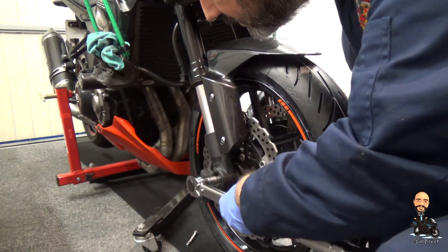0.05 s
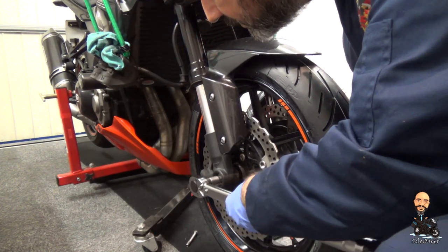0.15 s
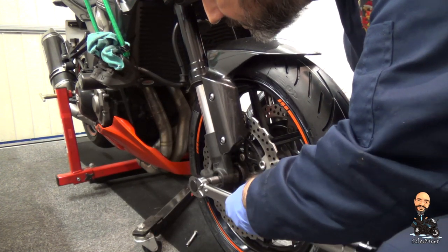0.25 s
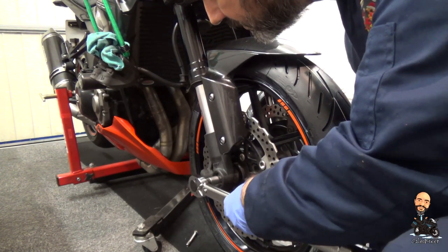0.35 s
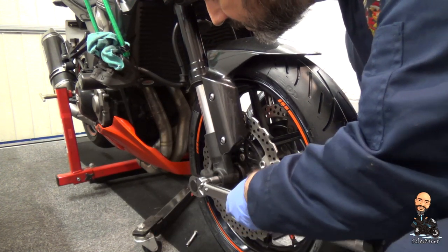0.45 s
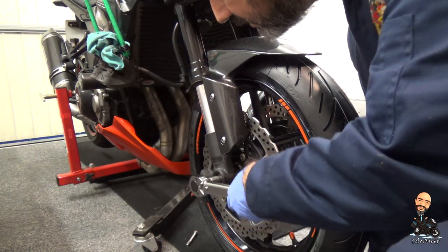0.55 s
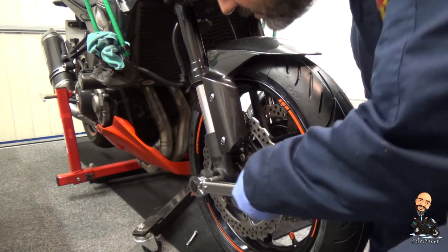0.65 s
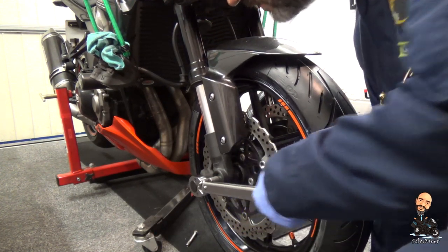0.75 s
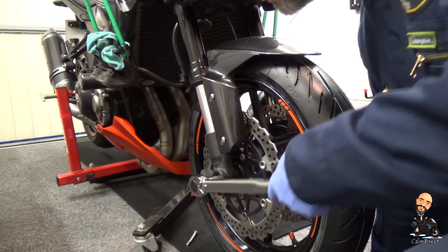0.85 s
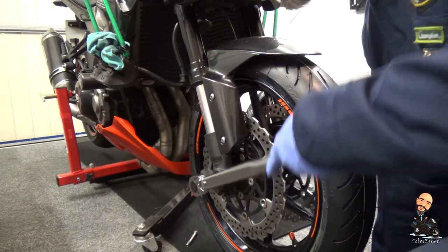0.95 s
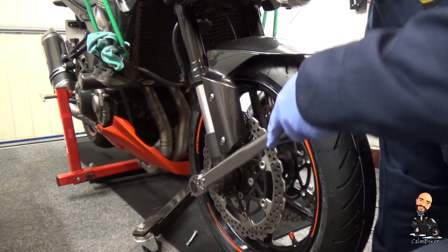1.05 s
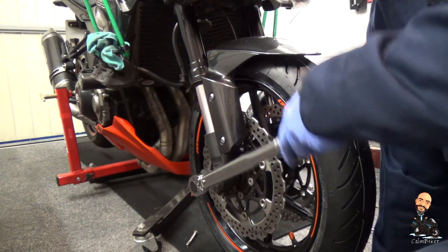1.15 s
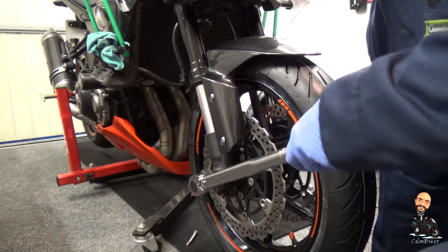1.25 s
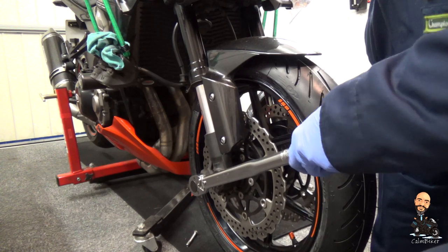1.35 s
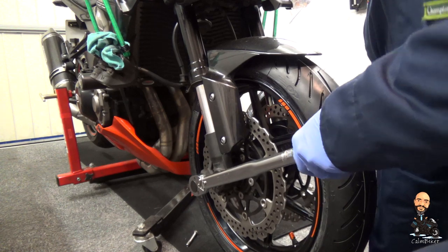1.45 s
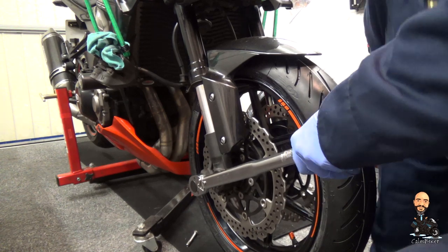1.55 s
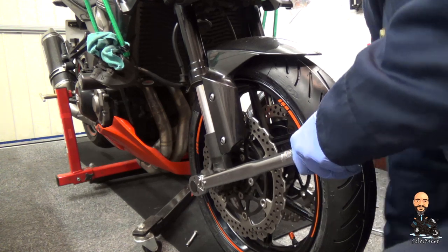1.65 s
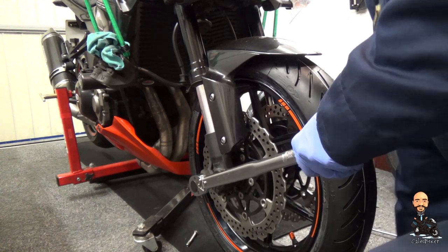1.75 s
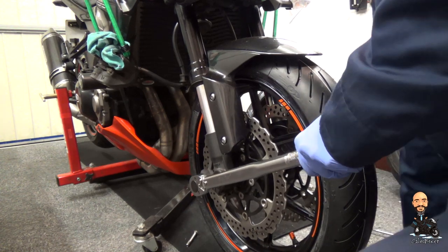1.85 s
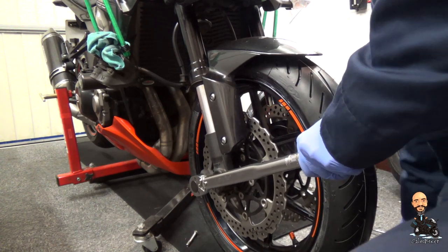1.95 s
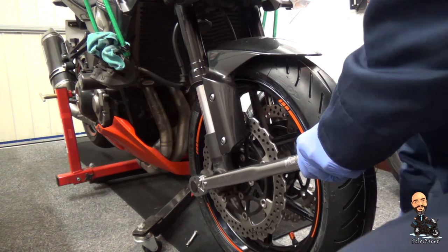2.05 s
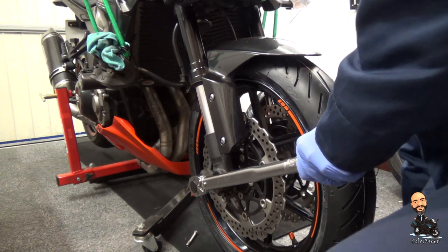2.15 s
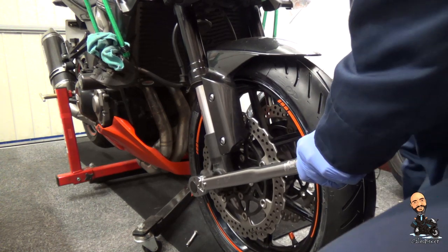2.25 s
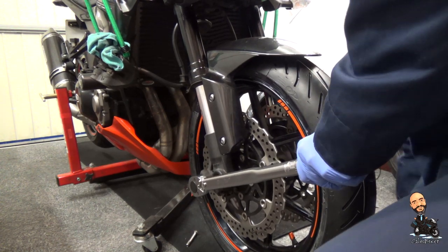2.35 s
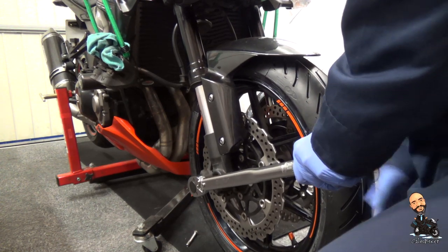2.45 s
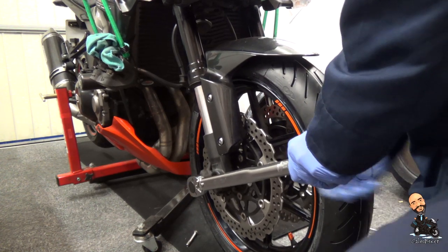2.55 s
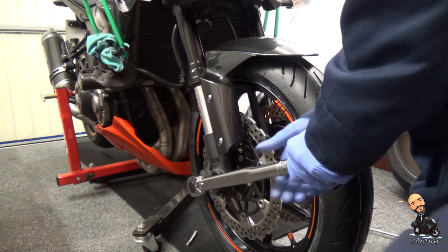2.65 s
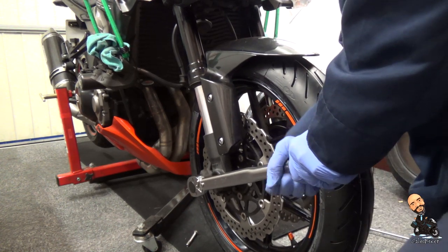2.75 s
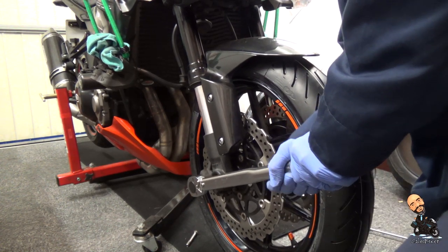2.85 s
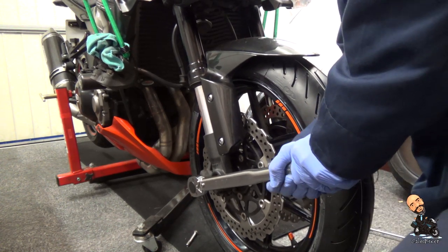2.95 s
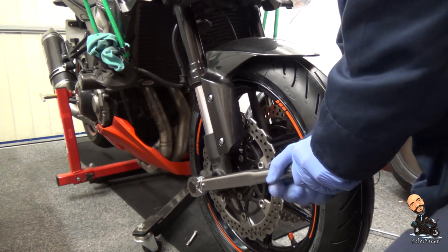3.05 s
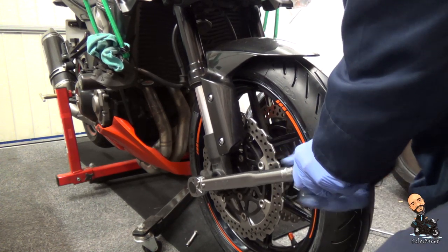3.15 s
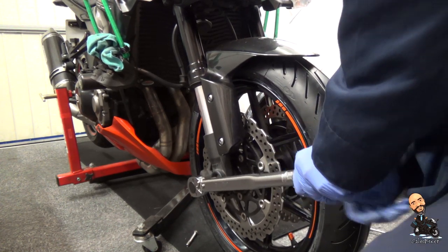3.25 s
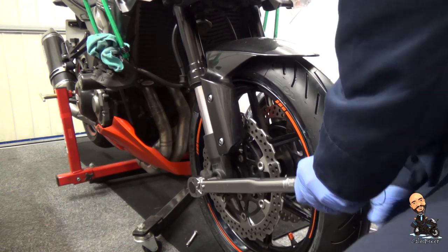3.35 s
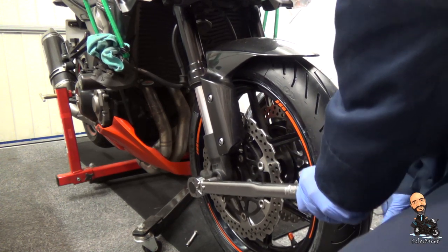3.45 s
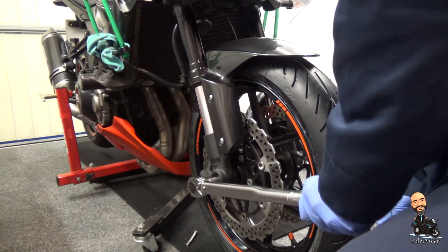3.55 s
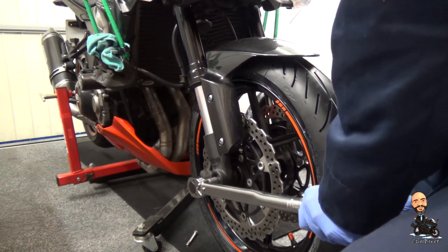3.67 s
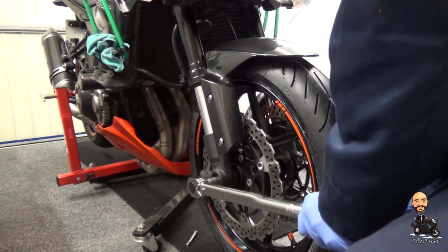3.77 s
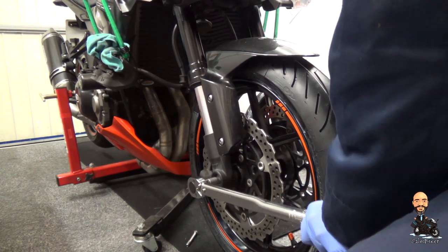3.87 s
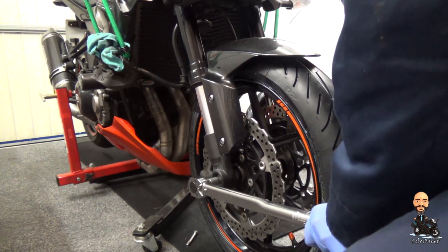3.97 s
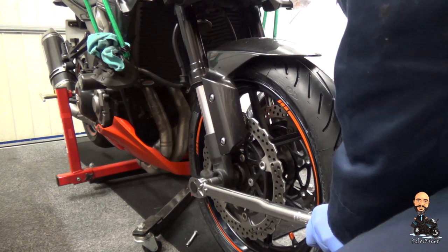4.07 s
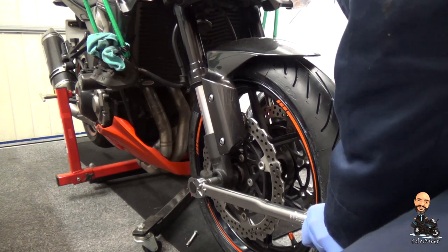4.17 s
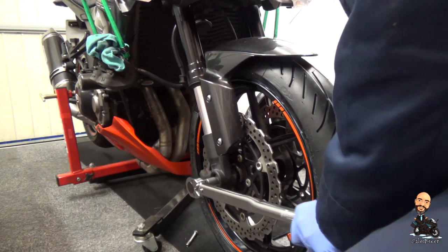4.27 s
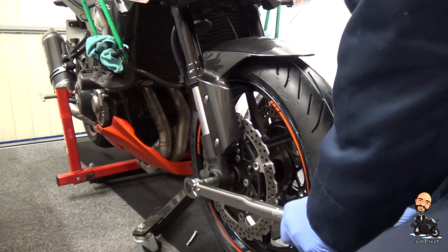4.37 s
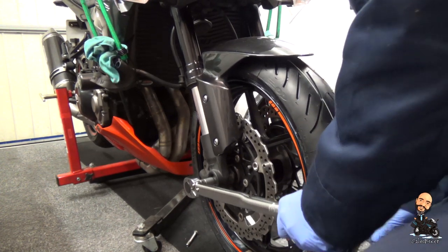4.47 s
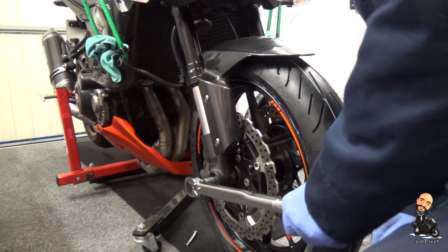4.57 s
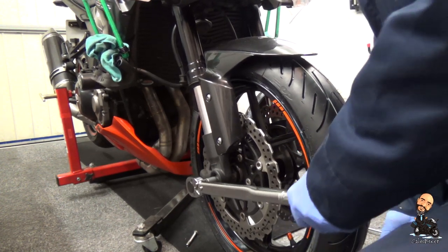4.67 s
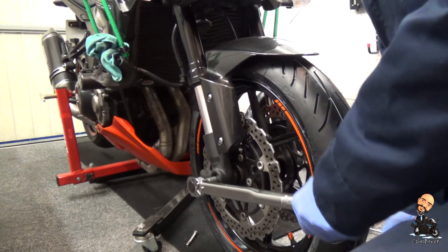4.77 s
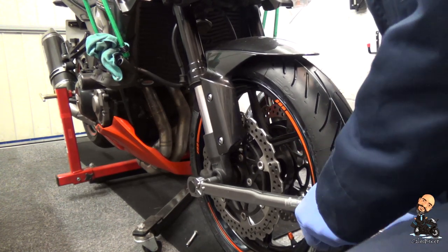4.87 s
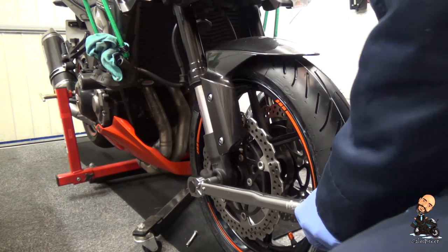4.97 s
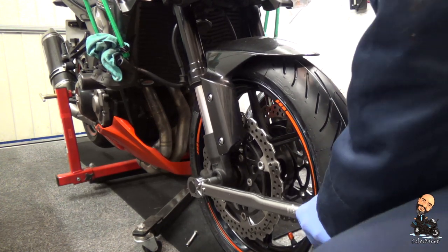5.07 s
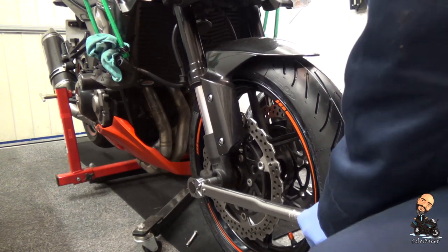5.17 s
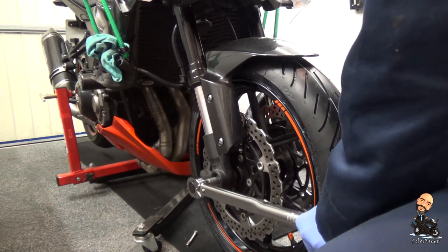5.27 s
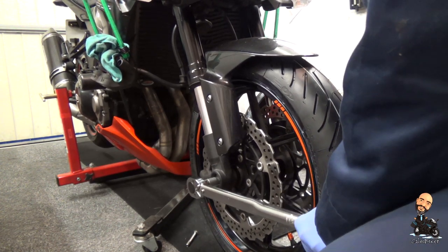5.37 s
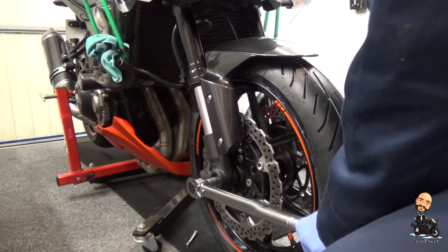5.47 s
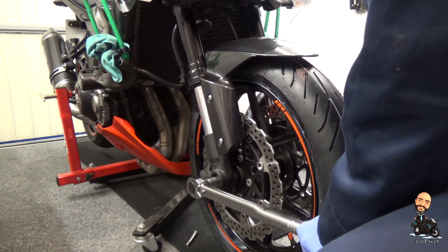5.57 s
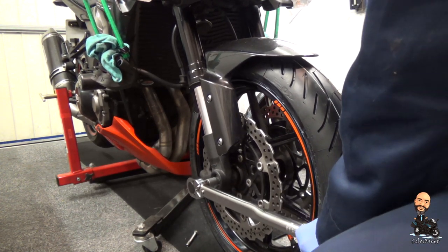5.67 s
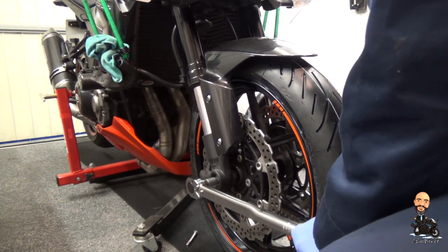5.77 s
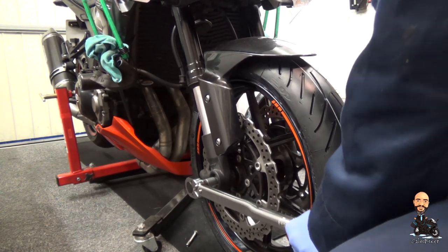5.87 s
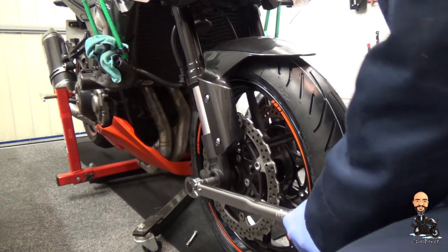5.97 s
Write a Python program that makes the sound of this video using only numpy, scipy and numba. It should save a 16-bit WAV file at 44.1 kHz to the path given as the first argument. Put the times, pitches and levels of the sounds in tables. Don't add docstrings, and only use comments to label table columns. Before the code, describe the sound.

A socket knocks home, a ratchet ticks twice, workwear rustles, then a torque wrench cracks loudly four times in a small hard-walled garage.

```python
import sys
import numpy as np
from scipy import signal
from scipy.fft import rfft, irfft, next_fast_len
from scipy.io import wavfile
from scipy.ndimage import uniform_filter1d
from numba import njit

SR = 44100
rng = np.random.default_rng(int(sys.argv[2]) if len(sys.argv) > 2 else 0)


def volts(x):
    e = np.asarray(x, float) / 20
    return 10 ** e


def master_out(mix):
    frames = np.transpose(np.atleast_2d(mix))
    ceiling = np.clip(frames, -1, 1)
    pcm = np.round(ceiling * 32767).astype(np.int16)
    wavfile.write(sys.argv[1], SR, pcm)


N = 265261
LEAD_S = .003


def on_log(table, hz):
    at_hz, value = np.transpose(table)
    return np.interp(np.log(np.maximum(hz, 1)), np.log(at_hz), value)


def shaped(x, gain):
    size = 2 * next_fast_len(len(x) // 2 + 1)
    hz = np.arange(size // 2 + 1) * SR / size
    return irfft(rfft(x, size) * gain(hz), size)[:len(x)]


def causal(gain_at):
    def gain(hz):
        fold = irfft(np.log(gain_at(hz) + 1e-9))
        half = len(fold) // 2
        fold = np.concatenate([fold[:1], 2 * fold[1:half], np.zeros(len(fold) - half)])
        return np.exp(rfft(fold))
    return gain


def bump(hz, centre_hz, octaves):
    return np.exp(-(np.log2(np.maximum(hz, 1) / centre_hz) / octaves) ** 2)


def unit(x):
    return x / np.sqrt(2 * np.max(uniform_filter1d(x ** 2, size=128)))


def fade(t, t60_s):
    return np.exp(-np.log(1000) * t / t60_s)


def add(out, at_s, sound):
    i = int(at_s * SR)
    sound = sound[..., :N - i]
    out[..., i:i + sound.shape[-1]] += sound


def walk(rate_hz):
    k = int(SR / rate_hz)
    return uniform_filter1d(np.repeat(rng.standard_normal(N // k + 1), k), k)[:N]


def ring(modes, length_s, scatter_db, rough=0.69):
    t = np.arange(int(length_s * SR)) / SR
    total = 0
    for hz, db, t60_s in modes:
        strength, *neighbours = rng.standard_normal(5)
        group = np.sin(2 * np.pi * hz * t)
        for off, turn in (neighbours[:2], neighbours[2:]):
            near_hz = hz + (10 + .0035 * hz) * (off + .5 * np.sign(off))
            group = group + rough * np.sin(2 * np.pi * near_hz * t + 3 * turn)
        total = total + volts(db + scatter_db * strength) * fade(t, t60_s) * group
    return unit(total)


def crack(spectrum, contact_ms, tilt_db, rise_ms=0.765, wet_db=0):
    n = np.arange(int(.12 * SR))
    t = np.maximum(n / SR - LEAD_S, 0)
    rise = np.minimum(1000 * t / rise_ms, 1) ** 2
    rattle = rng.standard_normal(len(t)) * fade(t, contact_ms * .003) * rise
    blow = np.sqrt(np.sum(rattle ** 2)) * (n == int((LEAD_S + rise_ms / 1000) * SR))
    tilt = lambda hz: tilt_db * np.log2(np.maximum(hz, 50) / 3000)
    colour = causal(lambda hz: volts(on_log(spectrum, hz) + tilt(hz)))
    direct = shaped(rattle, colour)
    level = unit(direct).std() / direct.std()
    quiet = np.minimum(n / (LEAD_S * SR), 1) ** 40
    return quiet * np.array([unit(direct), volts(wet_db) * level * shaped(blow, colour)])


# hz, level_db per Hz
HUSH_SPECTRUM = [(18, -58), (30, -14), (307, 4.5), (574, -6.5), (689, 1), (1390, 1.5), (2970, 0),
                 (3390, -2), (7610, -5), (12800, -7.5), (15400, -7.5)]


def hush():
    noise = shaped(rng.standard_normal(N), lambda hz: volts(on_log(HUSH_SPECTRUM, hz)))
    return noise / noise.std() * volts(-60.0)


def rumble():
    low = lambda hz: bump(hz, 112.0, 0.51) + 0.33 * bump(hz, 40., 1.2)
    mid, side = (shaped(rng.standard_normal(N), low) for _ in range(2))
    return volts(-84.0) * (mid + 0.19 * side * np.array([[1], [-1]])) / mid.std()


# hz, t60_s
ROOM_T60 = [(100, 0.41), (400, 0.37), (1500, 0.29), (5000, 0.28), (14000, 0.16)]


def room_response():
    gap_s, rise_s = .002, .004
    t = np.arange(int(.6 * SR)) / SR
    tail = np.zeros(len(t))
    for hz in 60 * 2. ** np.arange(9):
        band = shaped(rng.standard_normal(len(t)), lambda f: bump(f, hz, 0.98))
        build_up = np.clip((t - gap_s) / (rise_s + 5.4 / hz), 0, 1)
        tail += band * fade(t, on_log(ROOM_T60, hz)) * build_up
    spectrum = rfft(tail)
    power = lambda span_hz: uniform_filter1d(np.abs(spectrum) ** 2, size=int(span_hz * t[-1]))
    tail = irfft(spectrum * np.sqrt(power(500) / power(50)), len(t))
    tail = tail * np.clip((t - gap_s) / rise_s, 0, 1) * np.clip((t[-1] - t) / .1, 0, 1)
    return volts(-6) * tail / np.sqrt(np.sum(tail ** 2))


def movements(table):
    peak_s, rise_s, fall_s, level_db, shift_db = np.transpose(table)[:, :, None]
    late_s = np.arange(N) / SR - peak_s
    spans = np.where(late_s < 0, -late_s / np.maximum(rise_s, .02), late_s / np.maximum(fall_s, .02))
    gain = volts(level_db - 12 * spans)
    total = lambda g: np.sqrt(np.sum(g ** 2, axis=0))
    return total(gain), total(gain * volts(shift_db))


# peak_s, rise_s, fall_s, level_db, heaviness_db
FOLDS = [(0, .1, 0.084, -60, 4), (.82, 0.15, 0.14, -51, -20), (1.14, 0.84, 0.12, -48.5, -5),
         (1.29, 0.083, 0.18, -62, 12.5), (1.8, 0.47, 0.6, -49, -12), (2.33, 0.18, .1, -75, -9),
         (2.55, 0.2, 0.49, -47.5, -5), (2.77, 0.25, 0.036, -50.5, -22), (3.4, 0.21, 0.19, -46, -10),
         (4.4, 0.19, 0.15, -54, -6), (4.75, .1, 0.55, -59, -1.5), (5.75, .1, 0.25, -59, 3)]
# peak_s, rise_s, fall_s, level_db, coarseness_db
SLIDES = [(0, .1, 0.24, -56.5, -15), (.82, 0.21, 0.17, -44.5, 1), (.98, 0.26, 0.16, -47, -19),
          (1.18, 0.085, 0.08, -37.5, 5.5), (1.62, 0.22, 0.062, -50, 3), (1.98, 1, 0.11, -54, 1),
          (2.52, 0.93, 0.22, -56, -0.5), (2.78, 0.24, 0.11, -49, 2), (2.87, 0.097, 0.064, -49, -10),
          (3.09, .04, .1, -46, -8), (3.2, 0.18, 0.3, -52, -0.5), (3.5, .3, 0.058, -53.5, 8),
          (4.35, 0.057, 0.18, -61, 2), (4.73, .1, 0.057, -48.5, 0.5), (4.87, 0.034, 0.093, -48, 1.5),
          (5.08, 0.11, 0.32, -56, -16)]


def cloth():
    tight, heavy = movements(FOLDS)
    hiss, coarse = movements(SLIDES)
    rub = np.hypot(coarse, volts(-4.5) * tight)
    # level, rest_db, centre_hz, octaves, grain_db, flicker_hz, flicker_db
    bands = ((heavy, -65, 580.0, 0.67, 2.1, 31, 2),
             (tight, -90, 880.0, 1.55, 1.07, 13, 1.04),
             (rub, -88, 2610.0, 2.57, 2.3, 27, 0.75),
             (hiss, -68, 9860.0, 0.36, 2.3, 27, 3))
    out = np.zeros(N)
    for level, rest_db, centre_hz, octaves, grain_db, flicker_hz, flicker_db in bands:
        grains = rng.standard_normal(N) * volts(grain_db * rng.exponential(size=N))
        band = shaped(grains, lambda hz: bump(hz, centre_hz, octaves))
        flicker = volts(-9.0 + flicker_db * walk(flicker_hz))
        out += band / band.std() * np.hypot(level, volts(rest_db)) * flicker
    return out


def touches(table, skirt_db, rise_ms):
    out = np.zeros((2, N))
    for start_s, peak_db, centre_hz, contact_ms in table:
        colour = [(centre_hz / 8, 3 * skirt_db), (centre_hz, 0), (centre_hz * 8, 3 * skirt_db)]
        add(out, start_s - LEAD_S, volts(peak_db - 4.0) * crack(colour, contact_ms, 0, rise_ms, wet_db=-5.0))
    return out


# start_s, peak_db, centre_hz, contact_ms
BUMPS = [
    (.005, -54, 129, 27),
    (.57, -58, 260, 26),
    (1.07, -47.5, 253, 22),
    (1.28, -50, 168, 94),
    (1.38, -47, 300, 69),
    (.33, -44.5, 284, 60),
    (2.53, -52, 108, 35),
    (3.41, -58, 109, 25),
    (4.93, -47.5, 297, 27),
]


def body_bumps():
    return touches(BUMPS, skirt_db=-15.0, rise_ms=12.0)


# start_s, peak_db, centre_hz, contact_ms
CREASES = [(2.45, -42.5, 437, 83), (2.485, -43, 695, 21), (2.492, -47, 1160, 38), (2.52, -42, 785, 24),
           (2.545, -45, 1320, 22), (2.615, -43, 560, 12), (2.66, -44, 784, 11), (2.71, -43, 694, 19),
           (3.33, -44.5, 655, 14), (3.39, -40.5, 960, 25), (3.46, -47, 580, 51), (1.15, -36, 776, 51),
           (1.19, -45, 760, 37)]


def cloth_creases():
    return touches(CREASES, skirt_db=-23.5, rise_ms=9.0)


# start_s, peak_db, centre_hz, contact_ms
FIBRE_TAPS = [(.7835, -37.5, 9500, 5.5), (.862, -39, 11000, 5), (.897, -35, 10300, 22),
              (1.331, -41, 9000, 4), (1.375, -45, 9200, 8), (1.436, -45.5, 8500, 4),
              (1.706, -44.5, 9000, 4), (2.773, -39, 9920, 5), (2.874, -42, 10300, 5),
              (2.888, -46, 10500, 4), (2.92, -49, 10000, 5), (3.0889, -48.5, 10800, 5),
              (3.1462, -40, 10100, 2.7), (3.2779, -43, 9700, 6), (4.881, -45, 9000, 6),
              (4.892, -49, 11000, 5.8), (4.916, -42, 8900, 7), (4.935, -52, 8500, 5), (4.975, -51, 9000, 5)]


def fibre_slips():
    return touches(FIBRE_TAPS, skirt_db=-18, rise_ms=3.0)


# start_s, peak_db, centre_hz, contact_ms
GLOVE_TAPS = [
    (1.6886, -36.5, 9340, 5),
    (2.794, -33, 9000, 11),
    (2.9294, -39, 6480, 4),
    (3.035, -37.5, 8000, 14),
    (5.4159, -35.5, 6970, 8.2),
    (1.3015, -27, 3600, 8),
]


def glove_snaps():
    return touches(GLOVE_TAPS, skirt_db=-2.5, rise_ms=1.6)


# start_s, level_db, pitch_hz, t60_s
SQUEAK = (1, -39, 4502, 5)


def glove_squeak():
    out = np.zeros((2, N))
    start_s, level_db, pitch_hz, t60_s = SQUEAK
    chirp = ring([(pitch_hz, 0, t60_s)], .05, 0) * np.hanning(int(.05 * SR))
    add(out, start_s, volts(level_db) * chirp)
    return out


# start_s, peak_db, centre_hz, contact_ms
STEEL_TAPS = [(0.027, -50, 2600, 2.3), (0.5309, -37, 3920, 6.8), (1.2985, -24.5, 3000, 11),
              (1.302, -30.5, 2970, 14), (2.792, -39, 2900, 3), (2.844, -42.5, 1900, 4),
              (1.3135, -42, 2800, 4.9), (1.4337, -59, 2900, 5), (1.6, -37.5, 2540, 2.8),
              (2.4, -39, 3100, 6.3), (2.373, -39.5, 540, 8), (.212, -29, 3600, 10), (6.6, -50, 2500, 4.2),
              (1.24, -35.5, 1800, 5.3), (1.275, -34, 1470, 6.9), (4.868, -28, 1570, 31),
              (4.357, -51, 3200, 6), (3.6, -46, 2700, 4.2), (5.1484, -46.5, 5700, 4)]


def steel_taps():
    return touches(STEEL_TAPS, skirt_db=-17, rise_ms=.8)


# start_s, peak_db, centre_hz, contact_ms
HANDLE_TAPS = [(0.029, -50, 734, 22), (0.449, -54.5, 714, 10), (0.534, -41.5, 712, 43),
               (0.598, -45.5, 740, 17), (0.861, -43.5, 636, 8.3), (0.936, -41, 657, 7.5),
               (1.239, -38.5, 758, 12), (1.264, -41, 686, 8.4), (1.377, -45.5, 670, 5.6),
               (4.866, -39.5, 674, 41), (5.304, -54, 703, 11)]
# multiple of centre, level_db, t60_s
HANDLE_MODES = [(1, 3, 0.091), (1.87, 0.5, .055)]


def handle_knocks():
    out = touches(HANDLE_TAPS, skirt_db=-7, rise_ms=.8)
    for start_s, peak_db, centre_hz, _ in HANDLE_TAPS:
        modes = [(k * centre_hz, db, t60_s) for k, db, t60_s in HANDLE_MODES]
        add(out, start_s, volts(peak_db - 1) * ring(modes, .15, 1.0))
    return out


def struck(blows, spectrum, mode_hz, modes, column, ring_db):
    out = np.zeros((2, N))
    for start_s, peak_db, contact_ms, rise_ms, tilt_db in blows:
        add(out, start_s - LEAD_S, volts(peak_db) * crack(spectrum, contact_ms, tilt_db, rise_ms))
        shorter = min(contact_ms / 10, 1) ** 2
        body = [(hz, mode[column] + tilt_db * np.log2(hz / 3000) / 2, mode[0] * shorter)
                for hz, mode in zip(mode_hz, modes)]
        add(out, start_s + rise_ms / 1000, volts(peak_db + ring_db) * ring(body, .3, 1.6))
    return out


# start_s, peak_db, contact_ms, rise_ms, tilt_db per octave
SEATING = [
    (.2, -32.5, 310, 13.8, -3),
    (.209, -40, 10, 10, 3.5),
    (.2205, -14.5, 13, 3, 3.5),
    (.236, -25.5, 12, 2.07, -1),
]
# hz, level_db
KNOCK = [(47, -50), (80, -13), (563, -11), (751, 3.5), (1090, -18.5), (1370, -3.5), (3240, -18),
         (6500, -21), (10700, -28.5), (14600, -45), (16000, -85)]
SOCKET_HZ = [358, 391, 678, 780, 880, 1270, 1391, 1650, 1730, 2060, 2500, 2740, 4460]
# t60_s, level_db
SOCKET = [(0.34, -10), (0.35, -6), (0.16, -8), (0.12, -5.5), (0.073, 0.5), (0.25, -4), (0.074, 6),
          (.07, -9), (0.1, 5.5), (0.065, -18), (.066, -20), (0.058, -4), (.6, -36)]


def socket_seats():
    return struck(SEATING, KNOCK, SOCKET_HZ, SOCKET, column=1, ring_db=-4.0)


# start_s, peak_db, contact_ms, rise_ms, tilt_db per octave
FIRST_TOOTH = [
    (.9425, -25, 6, 2.5, 5.5),
    (.9712, -11, 8.3, 1.9, 2.5),
]
SECOND_TOOTH = [
    (1.116, -20.5, 7.5, 1.6, 5.6),
    (1.1335, -14.5, 14, 2, 2.4),
]
# hz, level_db
TICK = [(200, -62), (700, -19), (1050, -13), (1460, 0), (2400, 0), (3500, 3.5), (5800, 4.5), (6700, -3.5),
        (9240, 2.5), (12500, -1.5), (16000, -16)]
RATCHET_HZ = [760, 1400, 3500, 3850, 4750, 5045, 5875, 5940, 7725, 8900, 9190, 9560, 10500, 12400]
# t60_s, first_tooth_db, second_tooth_db
RATCHET = [(0.21, -16, -5.5), (0.13, -5, -13), (0.14, -1, -10), (0.078, -6, -10), (0.11, -4, -12),
           (0.15, -5, 1), (.14, 2, -8), (.17, -10, 1), (.08, 10, 1), (0.051, 2, 7), (0.088, -1, 0),
           (0.052, -20, 7), (.06, -5, 4), (.04, -16, -5)]


def ratchet():
    first = struck(FIRST_TOOTH, TICK, RATCHET_HZ, RATCHET, column=1, ring_db=-6.5)
    return first + struck(SECOND_TOOTH, TICK, RATCHET_HZ, RATCHET, column=2, ring_db=-5.5)


DISC_HZ = [1347, 1973, 2701, 3457, 4397, 5324, 6363, 8791]
DISC_SPLIT_HZ = [7.6, 22, 14.5, 9, 9.5, 24.5, 12, 15]
DISC_TWIN = [1, 1, -1, 1, 1, 1, 1, 1]
# t60_s, break_db, reset_db
DISC = [(4.2, -58.5, -72), (2.5, -57.5, -55), (3, -58.5, -54), (4.1, -67, -62.5), (0.53, -45, -31),
        (1.02, -44.5, -67), (0.58, -46, -45), (0.35, -52, -50)]


def brake_disc(column):
    t = np.arange(int(1.4 * SR)) / SR
    out = np.zeros(len(t))
    for hz, split_hz, twin, mode in zip(DISC_HZ, DISC_SPLIT_HZ, DISC_TWIN, DISC):
        pair = np.sin(2 * np.pi * hz * t) + 0.6 * twin * np.sin(2 * np.pi * (hz + split_hz) * t)
        out += volts(mode[column]) * fade(t, mode[0]) * pair
    return out


FORK_HZ = [241, 294, 331, 374, 426, 469, 496, 575, 647, 680, 754, 822, 910, 1052]
# t60_s, break_db, reset_db
FORK = [(0.41, -5, -10.5), (0.31, -6, -15), (.3, -6.5, -24), (0.25, 1.5, -10), (0.26, 3.5, 1.5),
        (0.3, 5.5, -8), (0.29, 0.5, -3.5), (0.4, -5, -14), (.22, 1.5, -9), (0.26, 5, 0.5), (.2, -13, 2),
        (0.28, -0.5, 0.5), (.2, -3, -5), (0.17, -6, -1)]


def fork_thud(column):
    modes = [(hz, mode[column], mode[0]) for hz, mode in zip(FORK_HZ, FORK)]
    thud = ring(modes, .45, 1.0, rough=.25)
    rise = np.minimum(np.arange(len(thud)) / SR / 0.0042, 1)
    return volts(np.array([[0], [-9]])) * thud * rise


def tube_ring(tube_hz, tube, rise_ms):
    tone = ring([(hz, *mode) for hz, mode in zip(tube_hz, tube)], .4, 0.79)
    return tone * np.minimum(1000 * np.arange(len(tone)) / SR / rise_ms, 1)


def pawl_blows(blows, spectrum, tube_hz, tube, column, rise_ms):
    near, disc = np.zeros((2, N)), np.zeros(N)
    thin = lambda hz: (1j * hz / (1j * hz + 1170.0)) ** 2
    for start_s, blow_db, thud_db, tilt_db in blows:
        direct, blow = crack(spectrum, 10.3, tilt_db, rise_ms, wet_db=4.5)
        add(near, start_s - LEAD_S, volts(blow_db) * np.array([shaped(direct, thin), blow]))
        add(near, start_s, volts(blow_db - 7.0) * tube_ring(tube_hz, tube, rise_ms))
        add(near, start_s + 0.00328, volts(blow_db + thud_db - 9.0) * fork_thud(column))
        add(disc, start_s, brake_disc(column))
    return near, disc


# start_s, blow_db, thud_db, tilt_db per octave
RESETS = [
    (4.523, 0.23, -0.5, 0),
    (6.0026, -2.3, -3, 0),
]
# hz, level_db
RESET_CRACK = [(71, -58), (120, -26), (200, -11), (418, -4.5), (592, -15.5), (684, -5), (1160, -14),
               (1370, -8), (1900, -10), (3900, -7.5), (6500, -13), (7200, -6.5), (16000, -20)]
RESET_HZ = [1404, 2450, 3260, 3832, 4390, 7214, 7257, 7682, 8520, 10000, 10300, 10550, 10900]
# level_db, t60_s
RESET_TUBE = [(-4.5, 0.18), (-6, 0.27), (-1.5, 0.055), (-6, 0.22), (-5.5, 0.23), (2.5, 0.24), (-4, 0.22),
              (-9, 0.18), (-14, 0.13), (11, 0.1), (-3, 0.06), (3, 0.078), (6, 0.12)]


def pawl_resets():
    return pawl_blows(RESETS, RESET_CRACK, RESET_HZ, RESET_TUBE, column=2, rise_ms=1.2)


# start_s, blow_db, thud_db, tilt_db per octave
BREAKS = [
    (3.946, 0.5, 3, 0),
    (5.5715, 1, 1.5, -0.5),
]
# hz, level_db
BREAK_CRACK = [(71, -56), (120, -26), (213, -10), (436, -2.5), (757, -7), (1070, -7.5), (1160, -8.5),
               (1680, -5.5), (3310, -7), (5990, -6), (6770, -5), (10800, -5), (16000, -23.5)]
BREAK_HZ = [1391, 1680, 2546, 3975, 4474, 5536, 6625, 6705, 6904, 7003, 7310, 8570, 8795, 10700]
# level_db, t60_s
BREAK_TUBE = [(-6, 0.16), (0.5, 0.045), (0, 0.069), (-4, 0.15), (1, 0.14), (-21, 0.39), (-16.5, 0.35),
              (-5, 0.2), (-3, 0.12), (0.5, 0.17), (-8, 0.26), (4, 0.1), (-6.5, 0.23), (-3, 0.099)]


def pawl_breaks():
    return pawl_blows(BREAKS, BREAK_CRACK, BREAK_HZ, BREAK_TUBE, column=1, rise_ms=.45)


# start_s, left_minus_right_db
LEAN = [
    (0, 1),
    (.45, -2),
    (.7, 0.7),
    (1.6, -1.2),
    (2.3, -1),
    (3.8, -0.8),
    (6, -0.5),
]
# hz, left_lead_rad
PORT_PHASE = [(60, .1), (250, .5), (520, .85), (1800, .45), (4000, .35), (7000, .08), (12000, 0)]
# hz, left_minus_right_db
PORT_BALANCE = [(100, 0), (380, 1), (700, 1), (1300, 1.2), (4400, 1), (10000, 1.7)]
# hz, level_db
UNLIKE = [(60, -20), (250, -22), (700, -7), (2000, -6.5), (4000, -5), (8000, -8.5), (14000, -17)]


def scene():
    break_near, break_disc = pawl_breaks()
    reset_near, reset_disc = pawl_resets()
    disc = break_disc + reset_disc
    taps = steel_taps() + glove_snaps() + handle_knocks() + cloth_creases() + body_bumps() + fibre_slips()
    small = socket_seats() + ratchet() + taps + glove_squeak()
    direct, to_walls = break_near + reset_near + small + cloth()
    alike, other = (signal.fftconvolve(to_walls, room_response())[:N] + hush() for _ in range(2))
    alike = alike + direct + disc
    other = shaped(other + disc, causal(lambda hz: volts(on_log(UNLIKE, hz))))

    def port(share):
        return lambda hz: volts(share * on_log(PORT_BALANCE, hz)) * np.exp(1j * share * on_log(PORT_PHASE, hz))

    lean_db = np.interp(np.arange(N) / SR, *np.transpose(LEAN)) * np.array([[.5], [-.5]])
    return volts(lean_db) * np.array([shaped(alike, port(0.33)) + other, shaped(alike, port(-0.66)) - other])


@njit
def limiter_gain(level, top, slope, attack, release):
    gain, envelope = np.empty(len(level)), 1e-9
    for i in range(len(level)):
        envelope += (level[i] - envelope) * (attack if level[i] > envelope else release)
        gain[i] = min(1., (top / envelope) ** slope)
    return gain


def top_cut(x):
    return signal.sosfilt(signal.butter(12, 16000, fs=SR, output="sos"), x)


def record(dry):
    mic_low_hz, mic_top_hz, whistle_hz, whistle_db = 175, 16100, 15625, -68.5
    limit_db, ratio, attack_s, release_s = -14.5, 15, .0004, .012
    ahead, ceiling = 30, .8
    dry = signal.sosfilt(signal.butter(N=2, Wn=mic_low_hz, btype="high", fs=SR, output="sos"), dry)
    level = np.sqrt(uniform_filter1d(np.mean(dry ** 2, axis=0), size=88) + 1e-18)
    gain = limiter_gain(level, volts(limit_db), 1 - 1 / ratio, 1 / (attack_s * SR), 1 / (release_s * SR))
    held = dry * np.append(gain[ahead:], np.full(ahead, gain[-1]))
    held = ceiling * np.tanh(held / ceiling)
    held = signal.sosfilt(signal.cheby2(N=10, rs=38, Wn=mic_top_hz + 250, fs=SR, output="sos"), held)
    whistle = np.sqrt(2) * volts(whistle_db) * np.sin(2 * np.pi * whistle_hz * np.arange(N) / SR)
    mix = held + rumble() + whistle * gain
    return top_cut(mix)


dry = scene()
out = record(dry)
master_out(out)
```